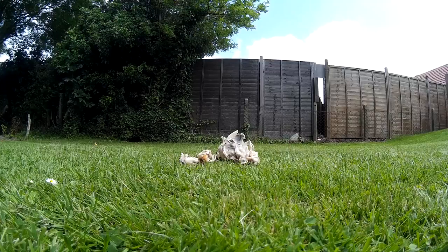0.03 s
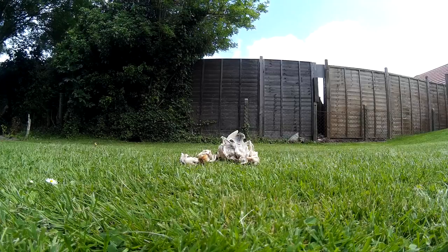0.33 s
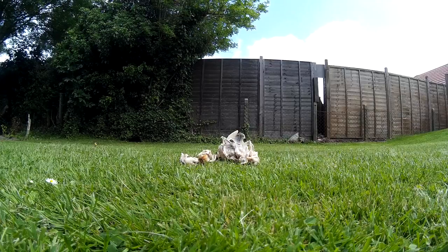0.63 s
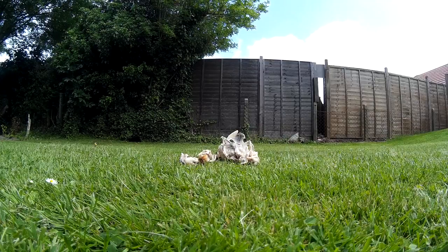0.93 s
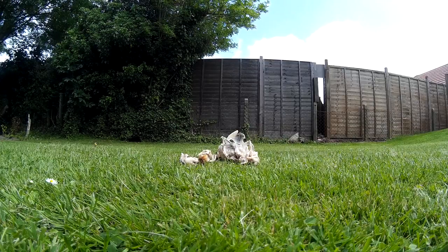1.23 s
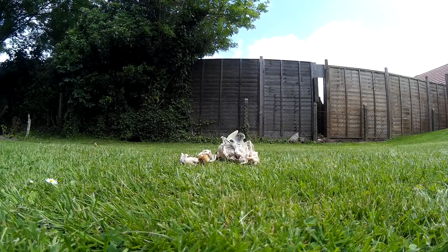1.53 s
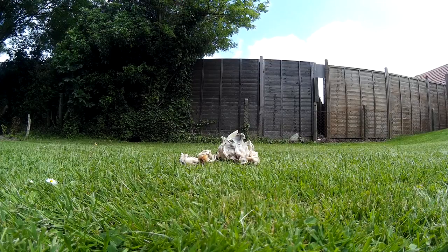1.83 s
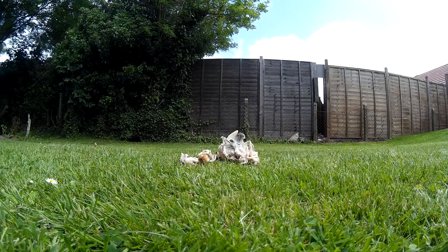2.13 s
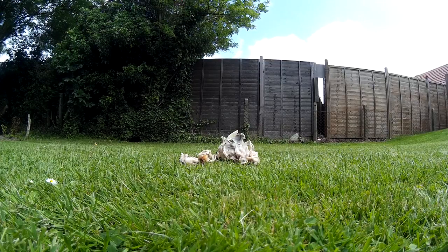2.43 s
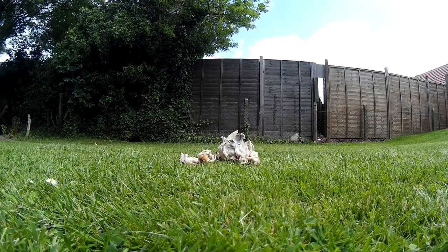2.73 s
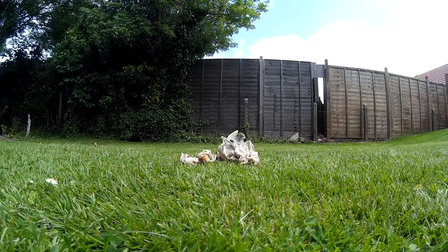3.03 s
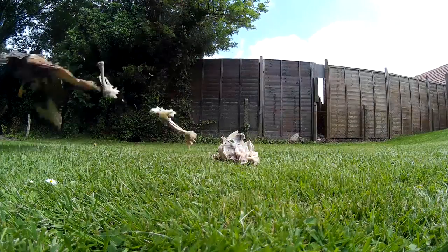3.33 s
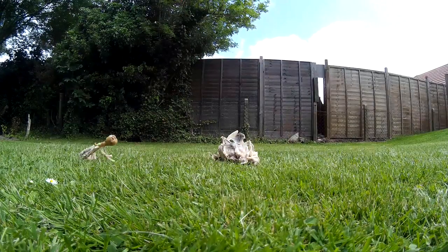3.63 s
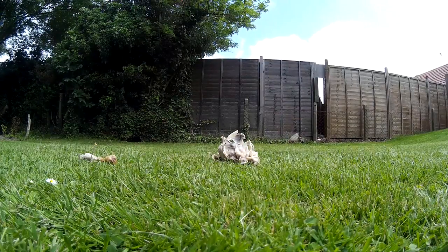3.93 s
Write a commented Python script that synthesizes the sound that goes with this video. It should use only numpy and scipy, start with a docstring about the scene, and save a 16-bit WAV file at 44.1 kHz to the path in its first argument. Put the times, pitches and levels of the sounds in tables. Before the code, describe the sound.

A large bird's long falling whistle as it swoops past, with wind and far traffic rumbling.

```python
"""Red kite swooping over a lawn

One long whistle: a quick rise, a held note that turns reedy with a second vibration in the throat
and swells as the bird swoops past, then a rough falling end. Wings and talons swish through the
grass close by. Behind it, dull wind and traffic come and go with a far engine's sinking drone."""
import sys
import numpy as np
from scipy import signal
from scipy.fft import rfft, irfft, next_fast_len
from scipy.io import wavfile
from scipy.ndimage import map_coordinates

SR = 44100
rng = np.random.default_rng(int(sys.argv[2]) if len(sys.argv) > 2 else 0)


def unload_audio(sound):
    """Save the sound as a 16-bit wav file, at the path given as the first command line argument."""
    columns = np.transpose(np.atleast_2d(sound))
    # keep every value between -1 and 1, then stretch to whole-number steps
    steps = np.round(np.clip(columns, -1, 1) * 32767)
    wavfile.write(sys.argv[1], SR, steps.astype(np.int16))


N = 176400


def amp(db):
    """Decibels to gain."""
    return 10 ** (np.asarray(db) / 20)


def unit(x):
    """Scale to rms 1."""
    return x / np.sqrt(np.mean(x ** 2) + 1e-20)


def clock():
    """The time of each sample in seconds."""
    return np.arange(N) / SR


def ramp(x):
    """A smooth fade from 0 to 1 as x goes from 0 to 1."""
    return np.sin(np.pi / 2 * np.clip(x, 0, 1)) ** 2


def swell(centre_s, width_s):
    """A bell-shaped envelope."""
    return np.exp(-.5 * ((clock() - centre_s) / width_s) ** 2)


def curves(rows):
    """One automation curve for each column after the time."""
    times, *columns = np.transpose(rows)
    return [np.interp(clock(), times, column) for column in columns]


def wobble(rate):
    """Smooth random modulation through `rate` points a second."""
    return map_coordinates(rng.standard_normal(N // 16), [clock() * rate], mode="wrap")


def filtered(x, response):
    """Equalise x with a gain given as a function of frequency."""
    size = next_fast_len(N + SR // 2)
    return irfft(rfft(x, size) * response(np.fft.rfftfreq(size, 1 / SR)), size)[:N]


def noise(colour):
    """Noise of rms 1, shaped by an EQ curve of (Hz, dB) points."""
    points_hz, db = np.transpose(colour)
    white = rng.standard_normal(N)
    return unit(filtered(white, lambda hz: amp(np.interp(np.log(hz + 1), np.log(points_hz), db))))


def wind_and_traffic():
    """Wind and far traffic: low rumble, midrange roar and upper rush swell over a deep bed."""
    # Envelopes. Each row: time in seconds, level in dB before the layer's trim.
    rumble_levels = [(0.07, -49), (0.18, -42.8), (0.36, -44), (0.55, -42), (0.74, -39.5), (0.8, -47),
                     (0.9, -44), (1.07, -40), (1.27, -49), (1.45, -43), (1.68, -40.5), (1.87, -40.5),
                     (1.95, -42), (2.2, -46.0), (2.4, -43.5), (2.5, -52), (2.95, -51), (3.15, -38.5),
                     (3.27, -43.5), (3.58, -35.5), (3.75, -39.9), (4, -39.5)]
    roar_levels = [(0.07, -53.5), (0.17, -46), (0.33, -47.7), (0.48, -42), (0.7, -46), (0.95, -53),
                   (1.27, -49.5), (1.49, -40.5), (1.57, -47.5), (1.74, -47), (1.86, -36), (1.94, -43.5),
                   (2.17, -44.9), (2.3, -40.5), (2.4, -45), (2.52, -52), (3.0, -53.5), (3.19, -47),
                   (3.26, -38), (3.66, -36.5), (3.8, -38.5), (4, -35.5)]
    rush_levels = [(0.07, -55), (0.18, -50), (0.35, -54.1), (0.55, -49.5), (0.73, -54.5), (1.27, -55.5),
                   (1.49, -47.5), (1.57, -52.5), (1.74, -50), (1.8, -43.5), (1.88, -42.5), (1.93, -47.0),
                   (2.17, -51.5), (2.28, -42), (2.37, -45.5), (2.52, -57), (3.0, -54.8), (3.19, -49.3),
                   (3.26, -40.9), (3.35, -43.5), (3.67, -35.9), (3.8, -42.5), (4, -39.5)]
    # EQ curves. Each row: frequency in Hz, relative level in dB.
    rumble_colour = [(45, -31), (75, -7), (115, -0.5), (140, -1.5), (190, 2), (250, -2.5), (310, -9),
                     (420, -22), (1000, -56.5)]
    roar_colour = [(150, -11.5), (250, -0.5), (340, 1), (420, 2.5), (480, 0.5), (550, 2), (620, -3),
                   (720, -8), (900, -17.5), (2000, -39), (4000, -70)]
    rush_colour = [(200, -10), (600, -2.5), (850, -3), (1080, 0.5), (1500, -4.5), (2100, -9.5), (2500, -10),
                   (2750, -21), (3100, -29), (3900, -41), (12000, -54)]
    deep_colour = [(15, -3), (35, -9.5), (65, 2), (95, 2), (150, -4.5), (400, -50)]
    rumble_trim_db, roar_trim_db, rush_trim_db = -3.5, -3, -1.6
    flutter_db = 0.47 * wobble(120)
    rumble = amp(rumble_trim_db + curves(rumble_levels)[0] + 0.23 * wobble(16)) * noise(rumble_colour)
    roar = amp(roar_trim_db + curves(roar_levels)[0] + flutter_db) * noise(roar_colour)
    rush_db = rush_trim_db + curves(rush_levels)[0] + flutter_db + 0.31 * wobble(25.57)
    rush = amp(rush_db) * noise(rush_colour)
    stirred = ramp((clock() - 3.2) / 0.33)  # the bed grows as the air is stirred
    deep = amp(-59.5 + 7.5 * stirred) * noise(deep_colour)
    return rumble + roar + rush + deep


def engine():
    """A far engine's drone sinks slowly in pitch; moving air makes each tone fade and waver."""
    # Each row: time in seconds, firing rate in Hz, gain of the low tones and of the high tones in dB.
    drone = [(0.1, 78.55, -56, -59.5), (0.48, 78.2, -58, -51.5), (0.9, 77.9, -73, -68.5),
             (1.25, 77.2, -54.5, -64), (1.5, 76.97, -52, -50.5), (1.7, 76.7, -46.5, -62.5),
             (1.87, 76.5, -44, -46.5), (2.1, 76.2, -48, -63.5), (2.33, 76.06, -44.5, -51.5),
             (2.6, 75.23, -65.5, -67), (2.95, 74.9, -63, -60), (3.15, 74.4, -56, -62),
             (3.32, 74.01, -41.5, -46.5), (3.65, 72.9, -43.5, -46.5), (4, 72.77, -55, -53)]
    # Each row: multiple of the firing rate, relative level in dB.
    low_tones = [(3, -16.5), (4, -1.5)]
    high_tones = [(6, -12), (7, -1.5), (8, -6)]
    fading_db, waver_rad = 2.5, .65
    firing_hz, low_db, high_db = curves(drone)
    phase = 2 * np.pi * np.cumsum(firing_hz) / SR

    def tones(rows):
        return sum(amp(db + fading_db * wobble(8.2)) * np.sin(k * phase + waver_rad * wobble(24))
                   for k, db in rows)

    return np.sqrt(2) * (amp(low_db) * tones(low_tones) + amp(high_db) * tones(high_tones))


def hiss():
    """A faint, even hiss that lifts a little at the swoop."""
    # Each row: time in seconds, level in dB.
    levels = [(3.2, -72), (3.3, -65.5), (4, -70)]
    # Each row: frequency in Hz, relative level in dB.
    colour = [(100, -16), (4000, 0), (9000, -3), (15000, -2)]
    return amp(curves(levels)[0]) * noise(colour)


def kite_whistle():
    """A nearly pure whistle, made reedy by a second vibration at about a third of its pitch."""
    # The melody. Each row: time in seconds, pitch in Hz, level in dB.
    call = [(2.535, 2620, -59), (2.555, 2776, -53.5), (2.574, 2920, -53), (2.581, 3272, -52),
            (2.61, 3256, -49.5), (2.655, 3147, -53.5), (2.675, 2824, -51.5), (2.71, 2665, -51),
            (2.76, 2603, -51), (2.8, 2520, -55), (2.89, 2454, -52.5), (2.93, 2487, -55), (2.96, 2443, -56),
            (3.06, 2437, -52.5), (3.11, 2468, -52), (3.21, 2443, -46), (3.27, 2392, -42),
            (3.305, 2408, -42), (3.335, 2381, -39), (3.41, 2382, -40), (3.48, 2449, -36.5),
            (3.52, 2385, -38), (3.57, 2423, -41.5), (3.62, 2485, -35.5), (3.69, 2364, -41),
            (3.77, 2350, -38), (3.83, 2275, -35.5), (3.865, 2147, -46.5), (3.905, 2090, -46.5),
            (3.94, 1833, -46.5)]
    # How the throat passes the overtones. Each row: frequency in Hz, gain in dB.
    throat = [(4000, -30), (4650, -22.5), (4950, -21.5), (5200, -15), (5500, -15), (6000, -23), (6500, -27),
              (6750, -46), (7400, -48), (7900, -31), (8400, -38), (9800, -42)]
    # Strength of the second vibration. Each row: time in seconds, side-tone gain in dB.
    reed_depth = [(2.72, -34), (2.79, -10), (2.95, -4.5), (3.12, -7.5), (3.27, -12.5), (3.44, -17.5),
                  (3.68, -15), (3.8, -21.5), (3.86, -13), (3.92, -7)]
    # Each row: multiple of the pitch, added multiple of the second vibration, relative level in dB.
    side_tones = [(1, -1, -12), (1, 1, -1), (1, 2, -10.5), (2, 1, -19.5), (2, 2, -29)]
    # The reediness drops out where the pitch is pushed up. Each row: centre, half length in seconds.
    pure_spells = [(3.49, 0.015), (3.617, 0.025)]
    attack_s, release_s, crack_s, crack_fade_s = 0.0056, 0.0073, 3.85, 0.029
    jitter, shimmer_db, reed_ratio, rasp_width_hz = .003, 0.56, .337, 512.6
    t = clock()
    pitch, level_db = curves(call)

    # At the end the voice cracks: rougher, duller, with an upward flick.
    cracked = ramp((t - crack_s) / crack_fade_s + .5)
    rough = 1 + 3 * cracked
    dull_db = -11 * cracked
    pitch = pitch * (1 + .055 * swell(3.885, width_s=.005))

    phase = 2 * np.pi * np.cumsum(pitch * (1 + jitter * rough * wobble(290))) / SR
    reed_phase = reed_ratio * phase + 0.41 * wobble(120)
    overtones = sum(amp(np.interp(k * pitch, *np.transpose(throat)) + 2 * wobble(20)) * np.sin(k * phase)
                    for k in (2, 3))
    whistle = np.sin(phase) + amp(dull_db) * overtones

    reed_gate = np.prod([ramp((abs(t - centre) - half) / .025 + .5)
                         for centre, half in pure_spells], axis=0)
    sidebands = sum(amp(db + dull_db * (k - 1) + 0.95 * wobble(45)) * np.sin(k * phase + j * reed_phase)
                    for k, j, db in side_tones)
    reed = amp(curves(reed_depth)[0]) * reed_gate * sidebands

    # A narrow band of air noise follows the pitch.
    breath = wobble(rasp_width_hz) * np.sin(phase) + wobble(rasp_width_hz) * np.cos(phase)
    rasp = amp(-34) * rough * breath

    gate = ramp((t - call[0][0]) / attack_s + .5) * ramp((call[-1][0] - t) / release_s + .5)
    envelope = gate * amp(level_db + shimmer_db * np.sqrt(rough) * wobble(90))
    return np.sqrt(2) * envelope * (whistle + reed + rasp)


def garden_scatter(x):
    """Fence and trees scatter the sound into a thin, short tail."""
    t60_s, onset_s, wet_db = 0.54, 0.0062, -13.5
    t = np.arange(SR // 2) / SR
    tail = rng.standard_normal(len(t)) * amp(-60 * t / t60_s) * ramp(t / onset_s)
    return amp(wet_db) * signal.fftconvolve(x, tail / np.linalg.norm(tail))[:N]


def swoop():
    """Feathers and talons brush the grass while the wings give a low push of air."""
    # Each row: centre in seconds, width in seconds, level in dB.
    swishes = [(3.256, .002, -67), (3.279, .0015, -67), (3.293, .003, -63), (3.3, .002, -63),
               (3.285, .045, -70)]
    # EQ curves. Each row: frequency in Hz, relative level in dB.
    swish_colour = [(500, -13), (2500, -1), (4000, 9), (6500, -3), (10000, 0), (12500, -7), (14000, -24)]
    draught_colour = [(20, 10), (50, -6), (150, -10), (600, -27), (3000, -70)]
    strokes = sum(amp(db) * swell(centre, width) for centre, width, db in swishes)
    rustle = unit(amp(3.4 * wobble(500)) * noise(swish_colour))
    draught = amp(-45) * swell(3.26, width_s=0.035) * noise(draught_colour)
    return strokes * rustle + draught


def scene():
    """The bird's call and swoop over a bed of wind, traffic, engine and hiss, in mono."""
    call = kite_whistle()
    fade_in = ramp((clock() - 0.064) / 0.01)
    bed = (wind_and_traffic() + engine() + hiss()) * fade_in
    return (bed + call + garden_scatter(call) + swoop())[None]


def record(dry):
    """A brick-wall low-pass takes off the very top."""
    cutoff_hz = 15700
    return filtered(dry[0], lambda hz: hz < cutoff_hz)[None]


dry = scene()
out = record(dry)
unload_audio(out)
```